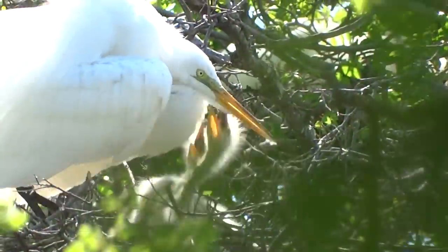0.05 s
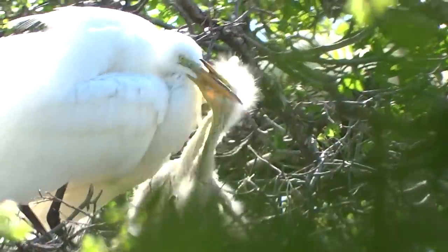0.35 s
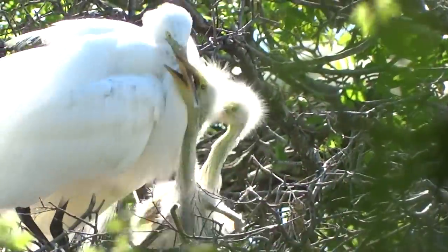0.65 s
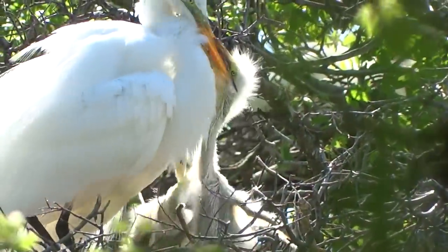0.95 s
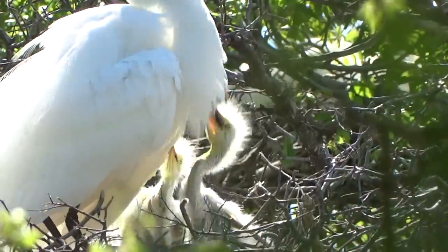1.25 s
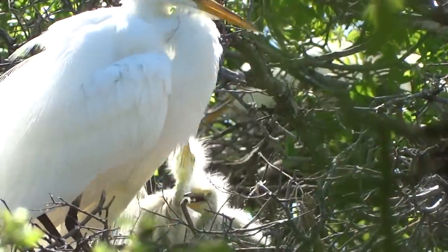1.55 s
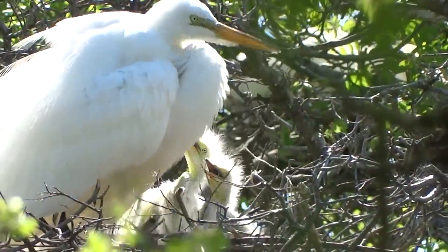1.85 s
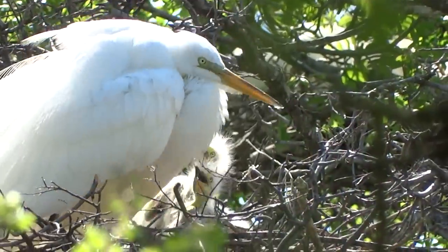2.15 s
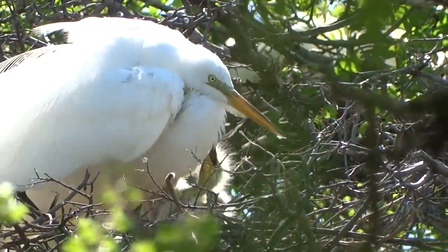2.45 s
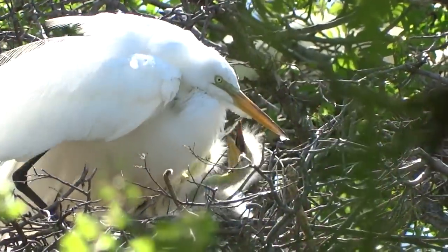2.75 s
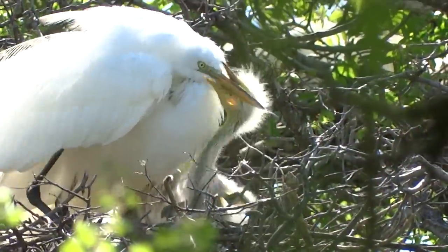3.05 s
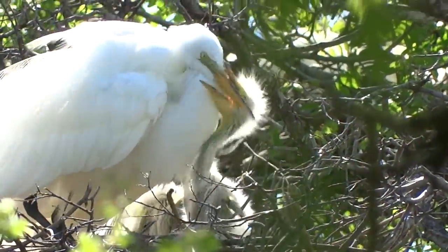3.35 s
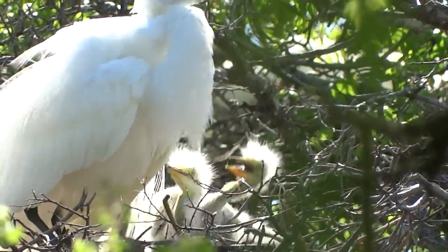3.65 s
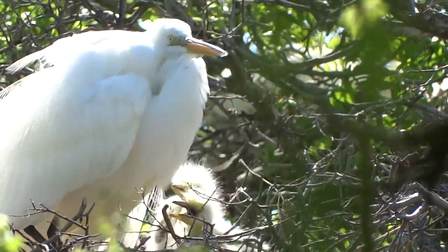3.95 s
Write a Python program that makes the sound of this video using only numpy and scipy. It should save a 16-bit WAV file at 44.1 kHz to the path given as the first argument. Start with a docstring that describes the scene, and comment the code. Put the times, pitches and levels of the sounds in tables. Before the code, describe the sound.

Dry rasping calls of egret chicks repeat outdoors among trees. Neighbouring chicks rasp and peep first, then closer ones join and a bill snaps once, while the distant colony blurs into a hiss over a faint low rush.

```python
"""Egret chicks beg in a heronry nest: short dry rasps, about three a second, each a train of uneven pulses
filtered by a high throat resonance. Neighbouring chicks rasp and peep further off, and distant adults give
short low croaks. Once a bill clacks and rings in damped modes; the trees return a short echo of calls and
clack. Twigs rustle faintly, and the whole colony blurs into a hiss over a low outdoor rush."""
import sys
import numpy as np
from scipy import signal
from scipy.fft import rfft, irfft, next_fast_len
from scipy.io import wavfile
from scipy.ndimage import map_coordinates

SR = 44100
rng = np.random.default_rng(int(sys.argv[2]) if len(sys.argv) > 2 else 0)


def wav_record(signal):
    """Record a signal, one row per channel, as 16-bit PCM in the file named by sys.argv[1]."""
    frames = np.transpose(np.atleast_2d(signal))
    bounded = np.clip(frames, -1, 1)
    # unit amplitude maps onto the largest positive 16-bit level
    quanta = np.round(bounded * 32767).astype(np.int16)
    wavfile.write(sys.argv[1], SR, quanta)


N = 176400

# spectral envelope of distant rasps, applied on top of the throat resonance: f/Hz, gain/dB
FAR_COLOUR = [(500, -5.5), (2000, -5.5), (3200, -0.5), (3800, 5.5), (5400, -0.5), (6100, -5), (6900, -25.5),
              (8000, -28), (9200, -33), (14000, -34)]
FAR_PULSE_HZ, FAR_JITTER, FAR_BREATH = 340, .17, .45  # breath: noise share of the source power
ATTACK_S, RELEASE_S = .018, .012


def near_chicks():
    """Formant resonance: pulses ring the throat of a begging chick at about 4.5 kHz."""
    # begging rasps: t/s, length/s, level/dB, throat f/Hz, pulse rate/Hz, treble gain/dB
    calls = [(1.507, 0.058, -27, 4600, 420, 1), (1.788, 0.054, -28, 4600, 370, 3.5),
             (2.141, 0.052, -28.5, 4560, 420, 1.5), (2.418, 0.061, -31.5, 4530, 380, 5.5),
             (2.765, 0.057, -29, 4440, 350, -1), (3.421, 0.015, -26, 4250, 330, -14),
             (3.439, 0.025, -26.5, 4520, 350, -3), (3.832, .040, -29, 4350, 350, -2.5)]
    # spectral envelope on top of the throat resonance: f/Hz, gain/dB
    colour = [(500, -10), (2000, -1.5), (3000, 10), (4000, 0), (5200, 2), (6100, 7), (6900, -6.5),
              (8000, -9.5), (9200, -20), (11000, -15.5), (14000, -27)]
    out = np.zeros(N)
    for start, length, db, throat_hz, pulse_hz, treble_db in calls:
        call = rasp(length, throat_hz, width_hz=750, pulse_hz=pulse_hz, colour=colour,
                    jitter=.12, breath=.28, treble_db=treble_db)
        add(out, start - ATTACK_S / 2, amp(db) * call)
    return out


def rasp(length, throat_hz, width_hz, pulse_hz=FAR_PULSE_HZ, colour=FAR_COLOUR,
         jitter=FAR_JITTER, breath=FAR_BREATH, treble_db=0, size=8192, count=96):
    """Source-filter model: uneven pulses, each with a puff of air, excite the throat resonance."""
    def throat(hz):
        resonance = 1j * hz * width_hz / (throat_hz ** 2 - hz ** 2 + 1j * hz * width_hz)
        return amp(along(colour, hz)) * resonance ** 2

    t = np.arange(size) / SR - ATTACK_S / 2
    periods = np.exp(jitter * rng.standard_normal(count))
    onsets = np.clip((np.cumsum(periods) - 1) * SR / pulse_hz, 0, size).astype(int)
    strengths = amp(1.2 * rng.standard_normal(count))
    pulses = np.bincount(onsets, strengths, size + 1)[:size]
    puffs = signal.lfilter([1], [1, -np.exp(-2 * pulse_hz / SR)], pulses) * rng.standard_normal(size)
    source = np.sqrt(1 - breath) * unit(pulses) + np.sqrt(breath) * unit(puffs)
    envelope = gate(t, length, ATTACK_S, RELEASE_S)
    voice = filtered(source * envelope, throat)
    treble = filtered(voice, lambda hz: 1 / (1 + np.exp((6400 - hz) / 250)))
    from_middle = np.minimum(np.abs(2 * t / length - 1), 2)
    treble_gain = amp(treble_db - 6.5 * from_middle ** 2)  # brightest mid-call
    return unit(voice - treble + treble * treble_gain) * np.sqrt(np.mean(envelope ** 2))


def clack(size=16384):
    """Modal ringing: a bill snaps shut and its damped modes sound, trailed by a faint bright scrape."""
    # bill impacts: t/s, level/dB
    impacts = [(3.449, -19.5)]
    # bill modes: f/Hz, relative level/dB, T60/s
    modes = [(1296, -6.5, 0.032), (1510, -7, 0.03), (1790, -10.5, 0.022), (2730, -12, 0.05),
             (5400, -7, 0.04)]
    # scrape spectrum: f/Hz, relative density/dB
    scrape_colour = [(3000, -1.5), (5800, 12), (7000, 1.5), (8000, -2), (9000, -21), (10400, -1.5),
                     (11300, -21), (14300, -27), (15200, -14)]
    ring_rise_s, scrape_rise_s, scrape_t60_s = .00031, .0072, .26
    out, t = np.zeros(N), np.arange(size) / SR
    for start, db in impacts:
        ring = np.zeros(size)
        for hz, mode_db, t60 in modes:
            phase = 2 * np.pi * hz * t + .61 * wobble(660, size)  # phase noise roughens the ring
            ring += amp(mode_db - 60 * t / t60) * np.sin(phase)
        ring *= 1 - np.exp(-t / ring_rise_s)
        scrape = unit(filtered(rng.standard_normal(size), lambda hz: amp(along(scrape_colour, hz))))
        scrape *= amp(-21.5 - 60 * t / scrape_t60_s) * (1 - np.exp(-t / scrape_rise_s))
        add(out, start, amp(db) * (ring + scrape))
    return out


def neighbours():
    """Formants set the timbre: high in other nests' dull rasps, lower in hoarse calls and clucks."""
    # neighbouring rasps: t/s, length/s, level/dB, throat f/Hz
    calls = [(0.02, 0.051, -34.5, 4890), (0.199, 0.099, -41, 4060), (0.287, 0.037, -31, 5030),
             (0.518, 0.038, -35, 4850), (0.593, 0.046, -33.5, 4720), (0.638, 0.019, -37.5, 4140),
             (0.691, 0.04, -36, 4680), (0.806, .09, -40.5, 4160), (0.903, 0.034, -39.5, 4960),
             (1.229, 0.0096, -28.5, 4760), (1.381, 0.051, -38, 4250), (1.482, 0.01, -25, 4720),
             (1.747, 0.054, -36.5, 4260), (1.868, 0.019, -38, 4330), (1.988, 0.028, -36.5, 4170),
             (2.155, 0.049, -38, 4000), (2.241, 0.029, -38.5, 4190), (2.312, 0.079, -37.5, 4000),
             (2.453, .05, -38, 4300), (2.552, 0.055, -35.5, 4420), (2.622, 0.033, -36.5, 4100),
             (2.868, 0.04, -33, 4020), (3.126, 0.046, -35, 4400), (3.396, 0.038, -40.5, 4060),
             (3.57, 0.041, -35.5, 4100), (3.759, 0.074, -37.5, 4040), (3.859, 0.032, -37.5, 3730)]
    # hoarse rasps further off: t/s, length/s, level/dB
    hoarse_calls = [(0.015, 0.038, -41.5), (0.231, .11, -48.5), (0.581, 0.083, -47), (1.366, 0.07, -48.5),
                    (2.448, .14, -49), (2.8, 0.15, -50.5), (3.658, .15, -47), (3.85, .11, -43.5)]
    # their spectral envelope: f/Hz, gain/dB
    hoarse_colour = [(1900, -8.5), (2500, 0), (4000, -2.5), (7000, -38.5)]
    # distant clucks: t/s, length/s, level/dB, throat f/Hz
    clucks = [(.216, 0.017, -45.5, 810), (0.442, 0.0081, -37.5, 984)]
    out = np.zeros(N)
    for start, length, db, throat_hz in calls:
        add(out, start - ATTACK_S / 2, amp(db) * rasp(length, throat_hz, width_hz=1450))
    for start, length, db in hoarse_calls:
        call = rasp(length, throat_hz=2736, width_hz=970, pulse_hz=260, colour=hoarse_colour)
        add(out, start - ATTACK_S / 2, amp(db) * call)
    for start, length, db, throat_hz in clucks:
        add(out, start - ATTACK_S / 2, amp(db) * rasp(length, throat_hz, width_hz=280))
    return out


def peeps(size=4096):
    """Frequency and amplitude modulation: thin whistles flutter as they glide through three pitches."""
    # peeps: t/s, length/s, level/dB, first f/Hz, middle f/Hz, last f/Hz
    whistles = [(0.125, 0.0087, -27.5, 4916, 4900, 4840), (0.359, 0.029, -31.5, 5080, 4870, 4560),
                (.582, 0.0098, -24.5, 4940, 4890, 4900), (0.593, 0.023, -28, 4860, 4800, 4690),
                (0.697, 0.043, -32, 4780, 4720, 4710), (0.8, 0.043, -26, 4940, 4840, 4770),
                (0.993, 0.035, -35, 5920, 5720, 5440), (1.038, 0.015, -29.5, 5550, 5590, 5420),
                (1.057, 0.0046, -23, 5230, 5020, 4940), (1.136, 0.017, -31, 4880, 5070, 5450),
                (1.154, 0.014, -34.5, 5540, 5100, 5000)]
    edge_s, waver_hz, flutter_db = .007, 75, 3.3
    out, t = np.zeros(N), np.arange(size) / SR - edge_s / 2
    for start, length, db, *pitches in whistles:
        hz = np.interp(t, [0, length / 2, length], pitches) + waver_hz * wobble(500, size)
        flutter = amp(flutter_db * wobble(600, size))
        tone = unit(np.sin(2 * np.pi * np.cumsum(hz) / SR) * flutter)
        add(out, start - edge_s / 2, amp(db) * tone * gate(t, length, edge_s, edge_s))
    return out


def crowd(count=160):
    """Superposition: remote chicks call over one another, each with its own throat resonance."""
    calls_per_s, low_hz, high_hz = 32, 3690, 5060
    level_db, spread_db = -39.5, 3.5
    out = np.zeros(N)
    for slot, (late, pitch, loud) in enumerate(rng.uniform(0, 1, (count, 3))):
        start = (slot + late) / calls_per_s
        call = rasp(length=.018, throat_hz=low_hz + pitch * (high_hz - low_hz), width_hz=470, size=4096)
        if start < N / SR:
            add(out, start, amp(level_db + spread_db * (2 * loud - 1)) * call)
    return out


def twigs():
    """Friction noise: nest twigs rustle in faint, grainy spells as the birds shift."""
    # rustles: t/s, length/s, level/dB
    rustles = [(0.314, 0.049, -71), (0.552, 0.091, -72), (0.888, .3, -75.5), (1.363, 0.096, -73.5),
               (1.855, 0.45, -74.5), (2.3, 0.66, -75), (2.968, .33, -74), (3.32, .66, -75.5)]
    # rustle spectrum: f/Hz, relative density/dB
    colour = [(5000, -15), (7000, 0.5), (8100, -1.5), (8900, -14.5), (10300, -18.5), (11500, -26.5)]
    grain_db, flutter_db = 3, 2.2
    envelope = spells([(start, length, amp(db)) for start, length, db in rustles], edge_s=.025)
    grain = amp(grain_db * wobble(540) + flutter_db * wobble(40))
    return envelope * unit(grain * stereo_noise(colour, coherence=[(8000, .3)]))


def colony():
    """Incoherent summation: countless distant chicks merge into a grainy, swaying hiss."""
    # hiss spectrum: f/Hz, relative density/dB
    colour = [(1500, -49), (2100, -15), (2450, -8.5), (2750, -6.5), (3200, -7.5), (4200, -1), (4800, -1.5),
              (5400, -6.5), (5900, -14.5), (6900, -37), (8000, -42.5), (8900, -53.5), (10300, -53),
              (11500, -61.5), (15500, -62.5)]
    # likeness of left and right: f/Hz, coherence
    coherence = [(2000, 0.8), (3000, 0.86), (4500, 1), (6000, .97), (7500, 0.27), (10000, 0.73)]
    level_db, sway_db, grain_db = -35.5, .35, 1.2
    envelope = amp(level_db + sway_db * wobble(14) + grain_db * wobble(600))
    return envelope * stereo_noise(colour, coherence)


def rush():
    """Ambient noise: the low rush of the open air, less coherent between the ears as frequency rises."""
    # rush spectrum: f/Hz, relative density/dB
    colour = [(25, -43.5), (154, -13), (196, -8), (268, -6), (381, -12), (879, 0.5), (1450, -3), (1810, -8),
              (2100, -15), (4000, -120)]
    # likeness of left and right: f/Hz, coherence
    coherence = [(100, 1), (300, 0.99), (600, .95), (900, 0.95), (1300, 0.71), (1900, 0.64)]
    # stereo balance: f/Hz, left minus right level/dB
    balance = [(250, 0), (500, 0), (750, -1.8), (1300, 1.5), (2000, 1.5)]
    # slight swell: t/s, level/dB
    swell = [(0, -43), (1.8, -43), (2.6, -42), (4, -41.5)]
    air = stereo_noise(colour, coherence)
    air = filtered(air, lambda hz: amp(np.outer([.5, -.5], along(balance, hz))))
    return amp(np.interp(np.arange(N) / SR, *np.transpose(swell))) * air


def among_trees(sound, wet_db, side_db=-17):
    """Reverberation: the trees add a short, nearly central tail whose top treble dies first."""
    # reverberation time: f/Hz, T60/s
    decay = [(500, 0.37), (4000, 0.44), (10000, 0.059)]
    hz, t, spectra = signal.stft(rng.standard_normal((2, SR // 2)), SR, nperseg=256)
    tail = signal.istft(spectra * amp(-60 * t / along(decay, hz)[:, None]), SR, nperseg=256)[1]
    mid, side = signal.fftconvolve(sound[None], tail / np.linalg.norm(tail[0]), axes=1)[:, :N]
    return sound + amp(wet_db) * (mid + amp(side_db) * np.array([side, -side]))


def stereo_noise(colour, coherence):
    """Mid-side mixing: two independent noises give a set spectrum and left-right coherence at rms 1."""
    def response(hz):
        angle = np.arccos(np.clip(along(coherence, hz), -1, 1)) / 2
        return amp(along(colour, hz)) * [np.cos(angle), np.sin(angle)]

    mid, side = filtered(rng.standard_normal((2, N)), response)
    return unit(np.array([mid + side, mid - side]))


def amp(db):
    """Decibels to amplitude ratio."""
    return 10 ** (np.asarray(db) / 20)


def unit(x):
    """Normalisation to rms 1."""
    return x / np.sqrt(np.mean(x ** 2) + 1e-20)


def along(points, hz):
    """Interpolation of (f/Hz, value) points on a logarithmic frequency axis."""
    knots_hz, values = np.transpose(points)
    return np.interp(np.log(hz + 1), np.log(knots_hz + 1), values)


def wobble(rate, size=N):
    """Random modulation: a spline through `rate` Gaussian knots a second."""
    knots = rng.standard_normal(int(size * rate / SR) + 4)
    return map_coordinates(knots, [np.arange(size) * rate / SR])


def filtered(x, response):
    """Linear filtering: the spectrum of x times a frequency response."""
    size = x.shape[-1]
    padded = next_fast_len(size + 4096)
    return irfft(rfft(x, padded) * response(np.fft.rfftfreq(padded, 1 / SR)), padded)[..., :size]


def add(track, start_s, sound):
    """Superposition of a sound on the track from start_s."""
    i = max(round(start_s * SR), 0)
    track[i:i + len(sound)] += sound[:N - i]


def gate(t, length, attack, release):
    """Envelope of two linear ramps, centred on t = 0 and t = length."""
    return np.clip(.5 + t / attack, 0, 1) * np.clip(.5 + (length - t) / release, 0, 1)


def spells(rows, edge_s):
    """Sum of ramped envelopes from rows of t/s, length/s, height."""
    t = np.arange(N) / SR
    return sum(height * gate(t - start, length, edge_s, edge_s) for start, length, height in rows)


def scene():
    """Superposition of nest, neighbours and colony; distant rasps carry the largest share of echo."""
    # lulls in the colony: t/s, length/s, depth/dB
    lulls = [(.085, 0.092, 2.5), (.475, .035, 4.5), (1.66, 0.1, 2.5), (2.67, 0.036, 4.5)]
    lull_gain = amp(-spells(lulls, edge_s=.03))
    birds = among_trees(near_chicks(), wet_db=-10.5)
    birds += among_trees(neighbours() + lull_gain * crowd(), wet_db=-5)
    birds += among_trees(peeps(), wet_db=-12)
    birds += among_trees(clack(), wet_db=-10)
    return birds + twigs() + lull_gain * colony() + rush()


def record(dry):
    """Band limiting: an ideal low-pass filter removes the highest treble."""
    return filtered(dry, lambda hz: hz < 15720)


dry = scene()
out = record(dry)
wav_record(out)
```